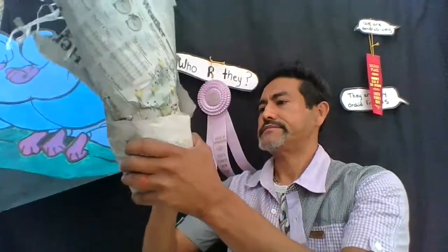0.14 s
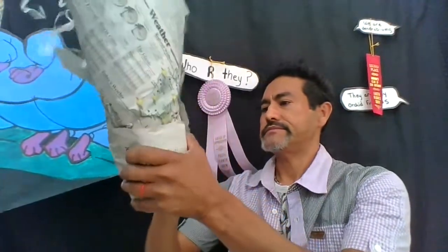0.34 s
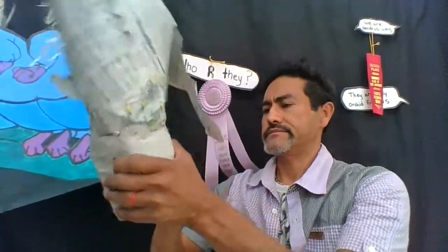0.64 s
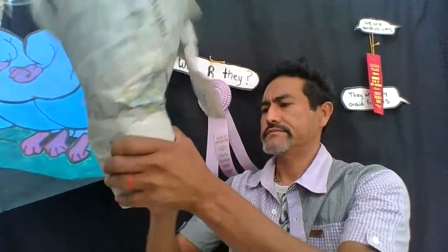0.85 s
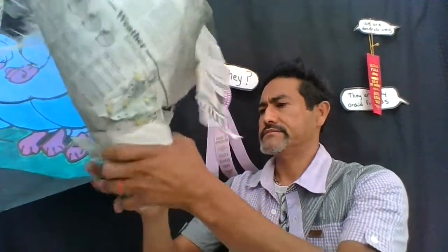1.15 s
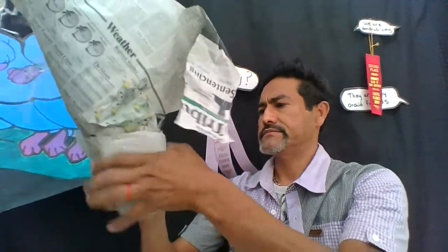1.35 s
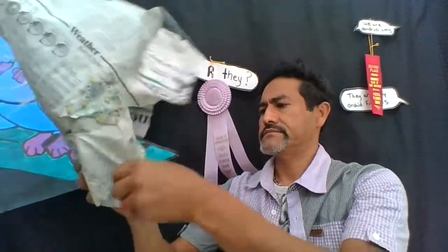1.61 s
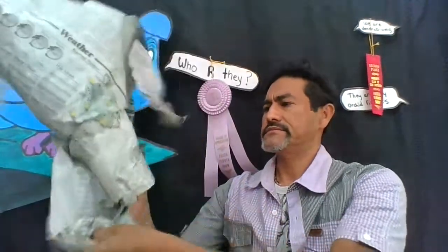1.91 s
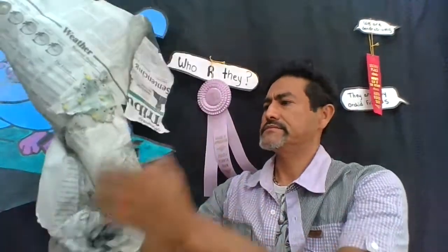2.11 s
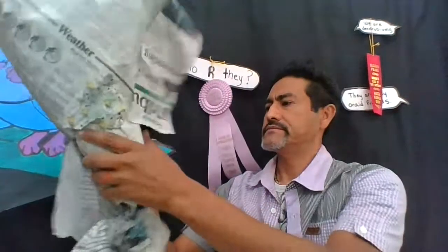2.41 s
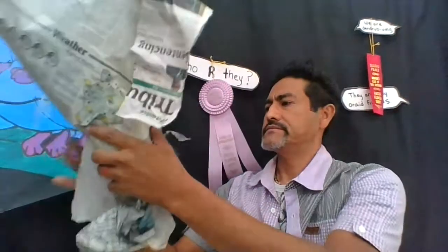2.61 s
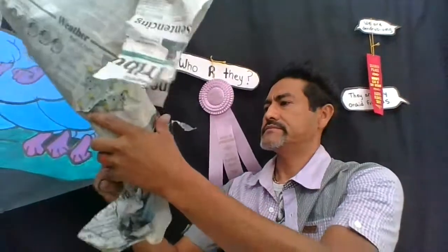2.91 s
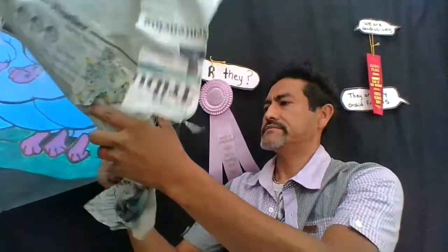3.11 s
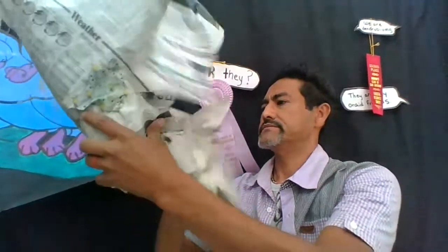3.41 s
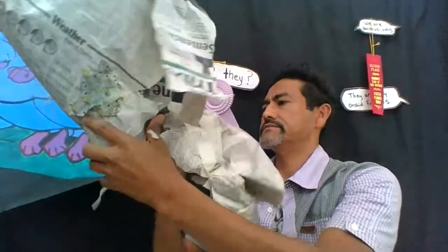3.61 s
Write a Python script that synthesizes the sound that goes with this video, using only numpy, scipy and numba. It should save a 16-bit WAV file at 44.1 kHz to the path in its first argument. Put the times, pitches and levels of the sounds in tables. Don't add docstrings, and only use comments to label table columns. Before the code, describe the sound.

Newspaper is crumpled and pulled off a bundle, close and dry in a small room with faint hum. Light rustling grows to crisp crackles at 0.5-1 s, eases, then surges with hard, bright snaps and a hollow thump around 1.5-1.95 s. A near-lull at 2.1-2.25 s leads to renewed bursts, strongest at 2.8-3 s; softer tugs and scattered ticks then settle until about 3.75 s.

```python
import sys
import numpy as np
from scipy import signal
from scipy.fft import rfft, irfft
from scipy.io import wavfile
from scipy.ndimage import uniform_filter1d
from numba import njit

SR = 44100
rng = np.random.default_rng(int(sys.argv[2]) if len(sys.argv) > 2 else 0)


def bounce(signal):
    frames = np.transpose(np.atleast_2d(signal))
    limited = np.clip(frames, -1, 1)
    pcm = np.round(limited * 32767).astype(np.int16)
    wavfile.write(sys.argv[1], SR, pcm)


def gain_from_db(level_db):
    decades = np.asarray(level_db, float) / 20
    return 10 ** decades


N = 165375

# (strongest at [s], effort [dB], rise [s per 26 dB], fall [s per 26 dB],
# extra level below 3.5 kHz [dB])
HAND_PULLS = [(.01, -33.5, 0.29, 0.8, 3.5), (.13, -35, 0.11, 0.2, -2), (.26, -30, 0.34, 0.48, 0.5),
              (0.515, -24, 0.013, .25, -4.5), (0.553, -23, 0.12, 0.1, 5), (0.656, -17.5, 0.0072, 0.4, 0.5),
              (.76, -23, 0.27, 0.24, 7), (0.879, -20, 0.16, 0.16, 4), (.97, -26, 0.2, 0.4, 3),
              (1.14, -28, 0.16, 0.6, 3), (1.21, -27.5, 0.63, 0.14, 0.5), (1.33, -30.5, 0.19, 1.2, 3),
              (1.5, -30, 0.08, 0.47, 6), (1.471, -17.5, 0.054, 0.31, 0), (1.53, -24.5, 0.24, 0.3, -20),
              (1.631, -24, 0.12, 0.1, -2.5), (1.792, -17.5, 0.25, 0.21, -0.5), (1.849, -22, 0.17, 0.27, 5),
              (1.972, -23, 0.24, 0.22, 3.5), (2.047, -26.5, 0.056, -0.36, -10), (2.07, -36, 0.024, -1.6, 0),
              (2.24, -36.5, 0.14, 0.1, -1.5), (2.273, -24.5, 0.017, 0.08, -12),
              (2.298, -22, 0.063, 0.32, 4), (2.472, -24, 0.1, 0.12, 2), (2.57, -33.5, 0.21, 0.26, 0.5),
              (2.622, -23.5, 0.069, 0.1, 5.5), (2.759, -28.5, 0.086, 0.1, 4), (2.82, -30, 0.0081, 0.27, 16),
              (2.832, -16, 0.021, 0.25, 0), (2.952, -19.5, 0.11, 0.17, 5.5)]
# (strongest at [s], effort [dB], rise [s per 26 dB], fall [s per 26 dB],
# extra level below 3.5 kHz [dB])
FREEING_PULLS = [
    (3.088, -21.5, 0.1, 0.45, 4.5),
    (3.169, -25, 0.1, 0.06, 2),
    (3.29, -26.5, 0.12, 0, 3.5),
    (3.45, -24, 0.066, 0.19, 1.5),
    (3.52, -34.5, .15, 0.3, 2),
    (3.4, -37, 0.52, 0.25, 5),
    (2.8, -33.5, 0.11, 0, 3),
    (3.726, -31, 0.42, 5.5, 2),
]
# (time [s], peak [dB], ring [Hz], length [ms])
EARLY_SNAPS = [(0.04, -14.5, 5830, 3.7), (0.206, -14, 4060, 3.1), (0.249, -16, 2420, 4.8),
               (0.267, -16, 3330, 2.1), (0.365, -5, 4630, 1.05), (0.45, -13.5, 11500, 1.5),
               (0.5105, -14, 9000, 0.4), (0.648, -16, 3650, 4), (0.661, -6, 3330, 2.7),
               (0.745, -9.5, 2940, 4.7), (0.788, -8.5, 1500, 2), (0.807, -6, 1340, 0.96),
               (0.856, -10, 5500, 2.7), (0.906, -4, 5140, 2.7), (0.969, -9.5, 9000, 1.9),
               (1.205, -8.5, 6000, 1.6), (1.259, -14, 9000, .6), (1.421, -8.5, 4000, 0.77),
               (1.512, -8, 8600, 1.9), (1.525, 1, 2340, 1.06), (1.535, -4.5, 2660, 3.1),
               (1.572, 0, 4600, 1.3), (1.614, -12, 10500, 1.7), (1.621, -3.5, 8900, 0.98),
               (1.648, -1.5, 11100, 1.7), (1.695, -11, 2950, 1.8), (1.734, -5.5, 6200, 2.7),
               (1.768, -7, 6240, 1.2)]
# (time [s], peak [dB], ring [Hz], length [ms])
LATE_SNAPS = [(1.804, 2, 11300, 3.2), (1.812, 0.5, 11000, 1.5), (1.847, 3, 10500, 3.7),
              (1.853, -1.5, 1070, 3.3), (1.919, -3.5, 2660, 1.6), (1.926, 0, 2950, 1.2),
              (1.94, -4, 6440, 0.77), (2.165, -14.5, 7300, 3.4), (2.174, -20, 7000, 1.5),
              (2.286, -10.5, 2170, 0.96), (2.3175, 1, 5180, 1.7), (2.339, -8.5, 1680, 0.71),
              (2.351, -3, 1680, 1.9), (2.41, -6, 7750, 2.3), (2.5565, -18.5, 11000, .6),
              (2.615, -8, 1990, 3.6), (2.632, -2.5, 3300, 2.25), (2.756, -16, 2150, 3),
              (2.798, -7.5, 7500, 1.7), (2.829, 3, 6800, 3.1), (2.878, -7, 2730, 5.3),
              (2.946, 0.5, 5160, 0.68), (2.956, 0, 9400, 2.8), (2.962, -2.5, 2240, 2.3),
              (3.115, -14, 2400, 2.5), (3.459, -6.5, 4020, 5.2), (3.704, -18, 6600, 1.7)]
# (time [s], peak [dB], ring [Hz])
CREASE_POPS = [(0.0065, -14.5, 2700), (0.1174, -18, 3440), (0.2114, -10, 1850), (0.4223, -17, 2870),
               (0.4544, -14.5, 14550), (0.4648, -17.5, 1360), (0.547, -13.5, 1810), (0.5682, -24, 14720),
               (0.6209, -10.5, 2180), (0.681, -11, 2920), (0.7483, -15, 3220), (0.782, -9, 1590),
               (1.0555, -10, 3250), (1.13, -17, 1670), (1.2118, -16.5, 3400), (1.2238, -5, 5770),
               (1.237, -19, 5770), (1.353, -15, 1750), (1.4306, -11, 3050), (1.4471, -9.5, 1970),
               (1.5319, -2, 14080), (1.6016, -12, 1470), (1.6088, -14, 1330), (1.7372, 2, 2900),
               (1.7748, -11.5, 2560), (1.8018, 0, 7530), (1.8585, -10, 1500), (1.913, -10, 2360),
               (1.9319, -5, 10980), (1.9762, -10, 1220), (2.043, -15.5, 14980), (2.0541, -23, 14720),
               (2.301, -16, 1670), (2.3875, -14, 730), (2.432, -20, 2190), (2.4717, -19, 990),
               (2.5053, -11, 5870), (2.515, -18, 7660), (2.6191, -1.5, 9210), (2.6244, -19, 1330),
               (2.6866, -25, 1590), (2.7896, -18, 2540), (2.8451, -7.5, 11360), (2.8705, 1, 10500),
               (2.8908, -1, 4430), (2.9257, -6, 2950), (3.07, -13, 2876), (3.1675, -9, 15000),
               (3.255, -11, 12270), (3.2875, -20.5, 13090), (3.2954, -14, 1490), (3.314, -15, 1630),
               (3.458, -12, 3830), (3.4666, -10, 920), (3.6317, -21.5, 14290), (3.668, -15, 4970),
               (3.7344, -14.5, 7520), (3.7483, -12, 11800)]
# (time [s], peak [dB], pitch [Hz])
AIR_THUMPS = [(0.207, -18.5, 840), (0.146, -27, 790), (0.784, -10.5, 527), (0.978, -19.5, 805),
              (1.484, -27.5, 324), (1.8, -23.5, 775), (1.847, -7, 760), (1.915, -14, 460),
              (1.988, -26, 135), (2.385, -17, 470), (2.465, -27.5, 140), (2.755, -21.5, 214),
              (2.816, -23, 368), (2.876, -14.5, 477), (2.963, -15, 308), (2.984, -22, 316),
              (3.009, -19.5, 340), (3.031, -23, 267), (3.49, -33, 90), (3.56, -32.5, 112)]
# (frequency [Hz], density [dB per Hz])
PAPER_TONE = [(88, -32), (150, -22.5), (382, -8.5), (756, -4.5), (901, -7), (1140, -6.5), (1500, -8),
              (2080, -5), (15800, -5)]
# (frequency [Hz], density [dB per Hz])
ROOM_TONE = [(25, 3.5), (150, -7), (400, -11), (1500, -12), (6000, -43)]
# (time [s], from [Hz])
WIDE_TREBLE = [(0.038, 4500), (0.204, 5230), (.44, 4930), (1.408, 6200), (1.6, 9000), (1.637, 5230),
               (1.726, 5200), (2.155, 5440), (2.306, 7260), (2.395, 10500), (2.811, 5560), (2.858, 5500),
               (2.939, 5200), (3.3, 5500), (3.6, 6800)]

CONE_HZ = 315.2
TOP_HZ = 15800
LARGEST = 3.0


def unit(x):
    return x / np.sqrt(np.mean(x ** 2))


def colour(x, table):
    hz, db = np.array(table).T
    f = np.maximum(np.arange(len(x) // 2 + 1) * SR / len(x), 1)
    gain = gain_from_db(np.interp(np.log(f), np.log(hz), db))
    return irfft(rfft(x) * gain, len(x))


def band(x, lo_hz, hi_hz):
    sos = signal.butter(2, [lo_hz, min(hi_hz, .45 * SR)], "band", fs=SR, output="sos")
    return signal.sosfilt(sos, x)


def walk(rate_hz):
    hold = int(SR / rate_hz)
    levels = rng.standard_normal(2000)[:N // hold + 1]
    steps = np.repeat(levels, hold)[:N]
    return unit(uniform_filter1d(uniform_filter1d(steps, hold), hold))


@njit
def grains(start, hz, cycles, size, turn, n, sr):
    out = np.zeros(n)
    for k in range(len(start)):
        p = np.exp(hz[k] / sr * (2j * np.pi - np.log(1000) / cycles[k]))
        z = size[k] * np.exp(2j * np.pi * turn[k])
        for i in range(int(start[k]), min(n, int(start[k] + cycles[k] / hz[k] * sr))):
            out[i] += z.imag
            z *= p
    return out


def scatter(per_s, lo_hz, hi_hz, cycles, scatter_db):
    when, pitch, rank, length, turn = rng.random((int(per_s * N / SR), 5)).T
    hz = lo_hz * (hi_hz / lo_hz) ** pitch
    size = gain_from_db(scatter_db * np.minimum(-np.log(1 - rank), LARGEST)) * hz ** 0.67
    return unit(grains(when * N, hz, cycles * (.5 + length), size, turn, N, 1. * SR))


def hand_effort():
    t = np.arange(0, N, step=45) / SR
    treble = bass = gain_from_db(2 * -61)
    for s, db, rise, fall, dull_db in HAND_PULLS + FREEING_PULLS:
        away = np.where(t < s, (s - t) / max(rise, .01), (t - s) / max(fall, .01))
        power = gain_from_db(2 * db - 52.9 * away)
        treble = treble + power
        bass = bass + power * gain_from_db(2 * dull_db)
    now = np.arange(N) / SR
    return np.interp(now, t, treble), np.interp(now, t, bass)


def sliding():
    flicker_db, flicker_hz = 2.1, 160
    ticks_per_s, tick_s, tick_db = 150, .0009, 4.2
    shared = walk(flicker_hz)
    hiss = np.zeros(N)
    for hz in 125 * 2 ** np.arange(8):
        octave = unit(band(rng.standard_normal(N), hz / 1.41, hz * 1.61))
        flicker = gain_from_db(flicker_db * (shared + walk(flicker_hz / 5)))
        hiss += np.sqrt(hz) * octave * flicker
    happens = rng.random(N) < ticks_per_s / SR
    ticks = happens * gain_from_db(tick_db * np.minimum(rng.exponential(size=N), LARGEST))
    catching = signal.lfilter([1], [1, -np.exp(-1 / (tick_s * SR))], ticks)
    return unit(hiss * (1 + catching / 2))


def fine_clicks():
    clicks = scatter(per_s=2500, lo_hz=1400, hi_hz=27000, cycles=3.2, scatter_db=1.5)
    return unit(colour(clicks, [(1000, 2.4), (16000, 3.1)]))


def crease_crackle():
    return scatter(per_s=420, lo_hz=910, hi_hz=16800, cycles=11., scatter_db=4.5)


def rustle():
    treble_power, bass_power = hand_effort()
    mix = gain_from_db(-2) * sliding() + gain_from_db(-7) * fine_clicks() + gain_from_db(-9) * crease_crackle()
    flap = unit(band(rng.standard_normal(N), 17, 290)) * gain_from_db(2 * walk(11))
    mix = unit(colour(mix, PAPER_TONE)) + gain_from_db(-21) * flap
    cone_level = gain_from_db(-27 + 3.6 * walk(24.74))
    mix = mix + cone_level * unit(band(rng.standard_normal(N), CONE_HZ / 1.065, CONE_HZ * 1.074))
    low = signal.sosfilt(signal.butter(2, 3500, fs=SR, output="sos"), mix)
    return np.sqrt(treble_power) * (mix - low) + np.sqrt(bass_power) * low


def room_hum():
    return unit(colour(rng.standard_normal(N), ROOM_TONE)) * gain_from_db(-46.5 + 1.0 * walk(4.18))


def wall_echo(paper):
    t60_s = 0.11
    t = np.arange(8000) / SR
    tail = rng.standard_normal(8000) * gain_from_db(-60 * t / t60_s) * (t > .003)
    return gain_from_db(-12.5) * signal.fftconvolve(paper, tail / np.sqrt(np.sum(tail ** 2)))[:N]


def snap(hz, ms):
    ring_q, rattle_db, rattle_s = 3.4, -24, .01
    t = np.arange(2048) / SR
    crack_noise, ring_noise, roughness = rng.standard_normal((3, len(t)))
    d = np.clip(ms, .3, 4.5) / 2000
    burst = t / d * np.exp(-t / d) * gain_from_db(2 * roughness)
    ring = band(ring_noise * burst, hz / (1 + 1 / ring_q), hz * (1 + 1 / ring_q))
    broad = unit(colour(crack_noise, PAPER_TONE))
    body = unit(band(broad, hz / 6, hz * 5.0))
    sheen = unit(band(broad, 8000, TOP_HZ))
    crack = unit(body + broad + gain_from_db(-7) * sheen)
    rattle = gain_from_db(rattle_db) * np.minimum(t / d, 1) * np.exp(-t / rattle_s)
    crack = crack * (burst + rattle)
    return 0.79 * crack / np.abs(crack).max() + gain_from_db(-4) * ring / np.abs(ring).max()


def snaps():
    pop_ms, pop_db = 0.81, -2
    pops = [(s, db + pop_db, hz, pop_ms) for s, db, hz in CREASE_POPS]
    out = np.zeros(N + 2048)
    for s, db, hz, ms in list(EARLY_SNAPS) + list(LATE_SNAPS) + pops:
        start = int(s * SR)
        out[start:start + 2048] += gain_from_db(db - 2) * snap(hz, ms)
    return out[:N]


def thumps():
    s, db, hz = np.array(AIR_THUMPS, float).T
    near_cone = np.abs(hz / CONE_HZ - 1) < 1 / 10
    cycles = 4.2 * (1 + near_cone)
    size = gain_from_db(db + 3.5)
    slow = grains(s * SR, hz, 2 * cycles, size, 0 * s, N, 1. * SR)
    fast = grains(s * SR, hz, cycles / 2, size, 0 * s, N, 1. * SR)
    return slow - fast


def scene():
    paper = rustle() + snaps() + thumps()
    return np.tile(paper + wall_echo(paper) + room_hum(), (2, 1))


def treble_spread(dry):
    length_s = 0.018
    hiss, side = rng.standard_normal(N), np.zeros(N)
    for s, lo_hz in WIDE_TREBLE:
        cut = slice(int(s * SR), int((s + length_s) * SR))
        treble = band(dry[0, cut], lo_hz, TOP_HZ)
        noise = band(hiss[cut], lo_hz, TOP_HZ)
        power = uniform_filter1d(treble ** 2, size=200) * np.hanning(len(noise))
        side[cut] = unit(band(noise, lo_hz, TOP_HZ)) * np.sqrt(power + 1e-18)
    return side


def top_limit(x):
    return signal.sosfilt(signal.ellip(10, .3, 60, TOP_HZ, fs=SR, output="sos"), x)


def low_pass(x):
    return signal.sosfilt(signal.butter(12, 16840, fs=SR, output="sos"), x)


def record(dry):
    side = treble_spread(dry)
    mix = np.clip(top_limit(dry), -1, 1) + gain_from_db(-8.5) * top_limit(side) * np.array([[1], [-1]])
    return low_pass(mix)


dry = scene()
out = record(dry)
bounce(out)
```